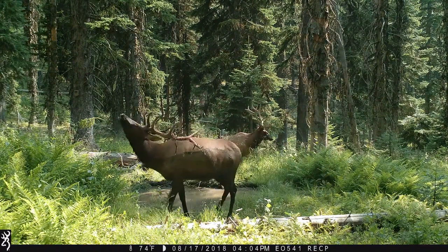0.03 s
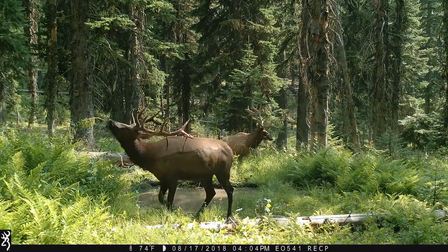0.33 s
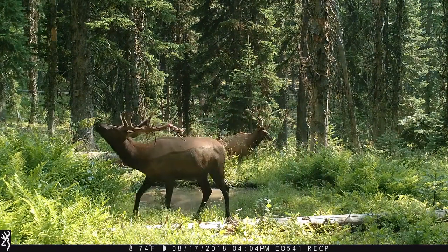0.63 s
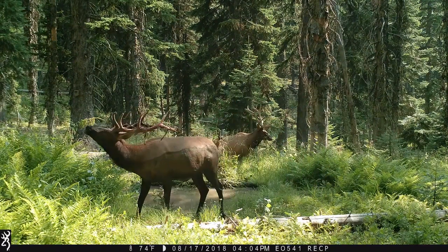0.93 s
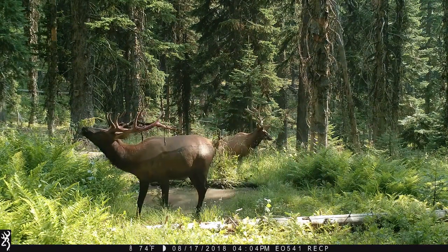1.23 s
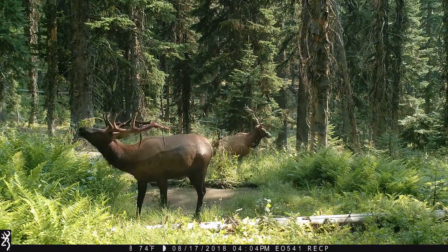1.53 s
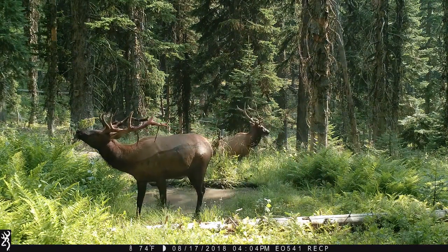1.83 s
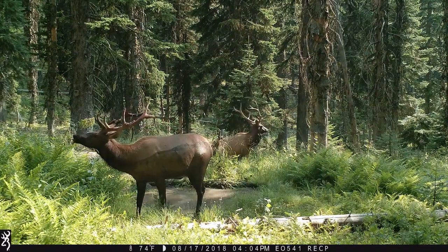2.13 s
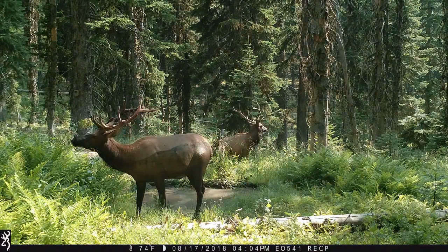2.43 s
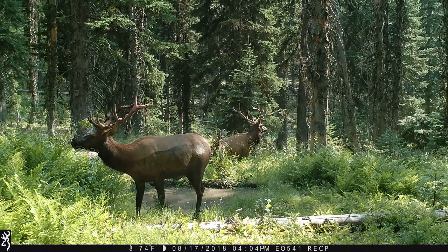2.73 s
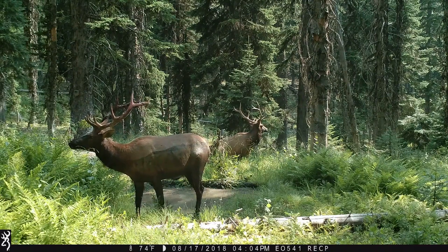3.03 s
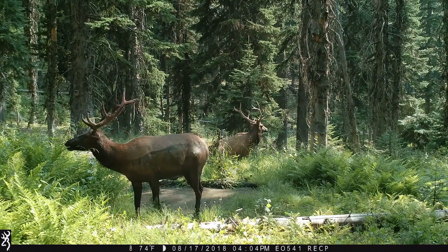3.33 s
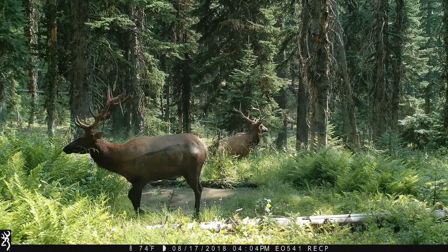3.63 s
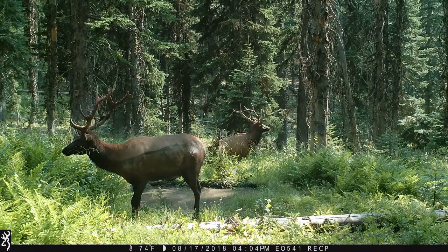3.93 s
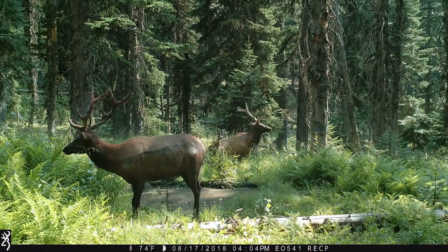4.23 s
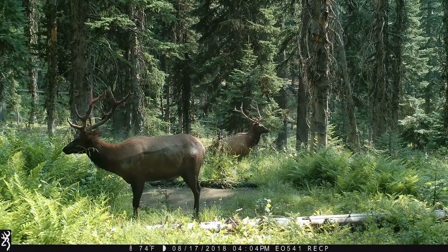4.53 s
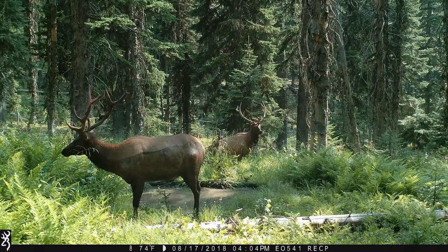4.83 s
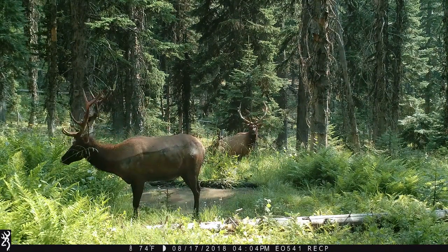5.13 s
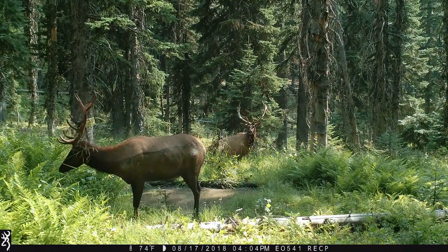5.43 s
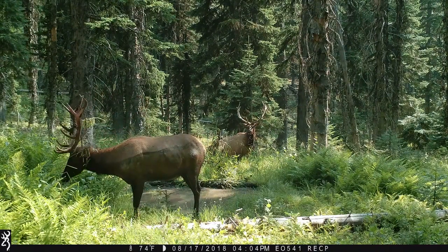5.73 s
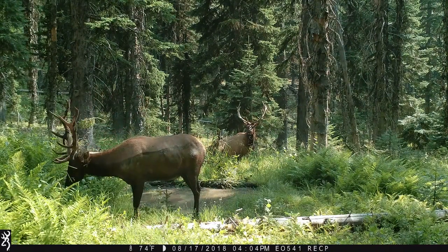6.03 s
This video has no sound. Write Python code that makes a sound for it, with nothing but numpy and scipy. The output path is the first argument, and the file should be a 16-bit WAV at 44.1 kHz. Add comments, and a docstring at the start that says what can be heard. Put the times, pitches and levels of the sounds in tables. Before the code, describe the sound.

From the start, an elk pushes out one long, high, fluttering hiss of air, strongest around 0.5 seconds and weakening near 2 seconds. At about 2.3 seconds it ends in a soft, lower, breathy huff. Ferns swish against the animal's legs during the hiss, and hooves thud softly on soil at about 0.4, 0.7 and 1.6 seconds. Twigs crackle in small clusters from 0.3 to 0.8 seconds, from 1.5 to 1.7, and from 2.3 to 2.5. At 3.5 seconds a dry stick gives one sharp, bright snap, by far the loudest sound. The breaking wood echoes faintly off the tree trunks. Lighter fern swishes come and go from about 3 seconds, growing fainter toward the end at 6 seconds. Underneath, a soft, even rush of forest air and a thin, high electronic whine stay constant. Everything is heard in mono.

```python
"""A bull elk hisses in the ferns

In a forest clearing the elk pushes air through its nearly closed mouth in one long hiss, then ends with
a soft, low huff. Ferns brush its legs, hooves thud, twigs crackle and one dry stick snaps loudly. The
breaking wood echoes off the trunks. A mono trail camera adds a thin electronic whine to the quiet air."""
import sys
import numpy as np
from scipy import signal
from scipy.fft import rfft, irfft, next_fast_len
from scipy.io import wavfile
from scipy.ndimage import map_coordinates

SR = 44100
rng = np.random.default_rng(int(sys.argv[2]) if len(sys.argv) > 2 else 0)


def wav_out(sig):
    """Save sig, one row per channel (or a flat mono array), as 16-bit PCM at SR to the path in sys.argv[1]."""
    wavfile.write(sys.argv[1], SR, np.round(np.clip(np.atleast_2d(sig).T, -1, 1) * 32767).astype(np.int16))


N = 272097


def hiss():
    """A fluttering jet of air rushes through the nearly closed mouth and makes it ring."""
    # How hard the elk blows. Each row: time in seconds, level in dB.
    effort = [(0, -34.5), (.24, -33.5), (.43, -31.5), (.66, -31.8), (.9, -35), (1.76, -35.7), (2.02, -41),
              (2.25, -41.5)]
    # The tone of the jet. Each row: frequency in Hz, relative level in dB.
    jet_spectrum = [(1000, -19), (2600, -19.5), (3650, -15.5), (4150, -5.5), (5400, -4.5), (5950, -0.4),
                    (6480, 0.5), (6950, -2), (7300, -2.5), (8300, -8.5), (9200, -9), (10800, -13.5),
                    (12500, -26), (15500, -29)]
    times, levels = np.transpose(effort)
    effort_db = np.interp(np.arange(N) / SR, times, levels)
    flutter = amp(0.61 * wobble(34.76) + 0.39 * wobble(260))
    jet = amp(effort_db) * coloured(rng.standard_normal(N), jet_spectrum)
    mouth = unit(filtered(rng.standard_normal(N), lambda f: resonance(f, hz=4010, width_hz=350) ** 2))
    mouth *= amp(-48.5 + 0.16 * (effort_db - levels.mean()))  # follows the effort only a little
    # When the jaw opens, the jet dies away and the ring of the mouth goes even faster.
    jaw_opens_s = 2.23
    jet *= gate(0, jaw_opens_s, rise_db_per_s=0, fall_db_per_s=54)
    mouth *= gate(0, jaw_opens_s, rise_db_per_s=0, fall_db_per_s=130)
    return flutter * (jet + mouth)


def huff():
    """The rest of the elk's air leaves through the open throat as a low huff."""
    # The tone of the open throat. Each row: frequency in Hz, relative level in dB.
    throat_spectrum = [(300, -10), (900, -5), (1500, -2), (1950, -1), (2500, -7), (3300, -5), (5000, -9),
                       (10000, -21)]
    start_s, hold_s = 2.316, 0.25
    flow = gate(start_s, start_s + hold_s, rise_db_per_s=160, fall_db_per_s=115)
    return amp(-45.5) * flow * coloured(rng.standard_normal(N), throat_spectrum)


def stick():
    """A dry stick snaps: its fibres break with bright pings, then the freed stick rings lower."""
    # The quick breaks that make up the snap. Each row: start in seconds, relative level in dB.
    fractures = [(3.4984, -6), (3.4989, -2.5), (3.4997, 1)]
    # The tones of a ping. Each row: pitch in Hz, relative level in dB, seconds to fade by 60 dB.
    ping_tones = [(2240, -28, 0.015), (3300, -23.5, 0.017), (4150, -39, .005), (5400, -12.5, 0.0047),
                  (5830, -12, 0.0061), (6400, -8.5, 0.0038), (6930, -8.5, 0.003), (8160, -12, 0.0042),
                  (8800, -26, 0.0054), (12500, -33, 0.0028)]
    # The ring of the stick as it bends: pitch in Hz, level in dB, seconds to fade by 60 dB.
    bend = (1340, -8.5, .014)
    out, t = np.zeros(N), np.arange(SR // 10) / SR
    opening_s = 0.00008
    opening = 1 - np.exp(-t / opening_s)  # a crack takes a moment to open, which softens it
    for start, db in fractures:
        ping = sum(amp(tone_db + rng.normal(0, 1) - 60 * t / fade_s) * np.sin(2 * np.pi * hz * t)
                   for hz, tone_db, fade_s in ping_tones)
        add(out, start, amp(db + 1.5) * ping * opening)
    # Splinters keep tearing just after the last break.
    tearing = np.zeros(N)
    add(tearing, fractures[-1][0], rng.standard_normal(len(t)) * amp(-17 - 60 * t / 0.03))
    out += filtered(tearing, lambda f: resonance(f, hz=6700, width_hz=7000) ** 2)
    bend_hz, bend_db, bend_fade_s = bend
    swell = 1 - np.exp(-t * bend_hz / 2)
    ring = np.sin(2 * np.pi * bend_hz * t) * amp(bend_db - 60 * t / bend_fade_s)
    add(out, fractures[0][0], ring * swell)
    # A thin stick gives off almost no bass.
    return signal.sosfilt(signal.butter(2, 1000, "highpass", fs=SR, output="sos"), out)


def ferns():
    """Fronds slide along the elk's legs and sides, each a soft swish full of tiny leaf ticks."""
    # One sweep of a frond. Each row: loudest moment in seconds, level in dB, length in seconds.
    sweeps = [(0.062, -39, 0.23), (0.414, -35.5, 0.2), (.6, -40.5, 0.29), (0.736, -39.5, .07),
              (1.06, -35, 0.13), (1.28, -44.5, .2), (1.636, -40.5, 0.49), (1.95, -43.5, 0.37),
              (2.224, -38.5, .16), (3.15, -49, 0.25), (3.328, -46, 0.15), (3.466, -44.5, 0.17),
              (3.59, -41.5, 0.26), (3.934, -46.5, 0.26), (4.047, -50.5, 0.13), (4.43, -45, .14),
              (4.52, -48.5, 0.46), (5.04, -51, 0.31), (5.284, -49, .2), (5.69, -53, .8)]
    # The tone of the swish. Each row: frequency in Hz, relative level in dB.
    swish_spectrum = [(500, -14.5), (2000, -9), (3300, -1.5), (4600, -2.5), (6300, 1), (8500, -0.5),
                      (10500, -6), (12500, -7), (15500, -16)]
    ticks_per_s, rise_db, fall_db = 900, 18.5, 10
    ticks = (rng.random(N) < ticks_per_s / SR) * rng.standard_normal(N)
    ticks *= amp(3.5 * np.minimum(rng.exponential(size=N), 4))  # a few stand out
    rub = rng.standard_normal(N) + amp(-6.5) * unit(ticks)
    power = sum((amp(db) * gate(peak_s, peak_s, rise_db / length, fall_db / length)) ** 2
                for peak_s, db, length in sweeps)
    power += amp(-59.5) ** 2  # the ferns never lie quite still
    return np.sqrt(power) * coloured(rub, swish_spectrum)


def twigs():
    """Each twig gives a short crack that rings briefly at its own pitch, then crumbles."""
    # Twigs breaking under the hooves. Each row: start in seconds, level in dB, pitch in Hz.
    cracks = [(.318, -25, 2900), (0.356, -22.5, 2200), (.368, -22, 2120), (.369, -23, 3550),
              (.409, -24.5, 2140), (.438, -26.5, 2060), (.616, -28, 2530), (0.7485, -22, 1600),
              (1.509, -29.5, 2920), (1.512, -30, 1600), (1.537, -31, 1800), (1.742, -27.5, 3380),
              (2.273, -26.5, 1800), (2.461, -28.5, 4500), (2.463, -25, 1810), (2.491, -26, 2120)]
    out, t = np.zeros(N), np.arange(SR // 16) / SR
    f = np.fft.rfftfreq(len(t), 1 / SR)
    snap = amp(-60 * t / 0.0059)
    crumble = amp(-9.5 - 60 * t / 0.055)
    for start, db, hz in cracks:
        burst = rng.standard_normal(len(t)) * (snap + crumble)
        crack = irfft(rfft(burst) * resonance(f, hz, width_hz=1160) ** 2, len(t))
        add(out, start, amp(db - 0.5) * crack / np.abs(crack).max())
    return out


def hooves():
    """A hoof pushes into soft soil and thuds: a few low vibrations that die quickly."""
    # The footfalls. Each row: start in seconds, level in dB, pitch in Hz.
    steps = [(0.358, -29, 570), (.731, -27, 200), (1.572, -33.5, 80)]
    out, t = np.zeros(N), np.arange(SR // 5) / SR
    for start, db, hz in steps:
        cycles = hz * t
        swell = 1 - np.exp(-cycles / 0.13)
        add(out, start, amp(db - 5 * cycles) * swell * np.sin(2 * np.pi * cycles))
    return out


def trunk_echo(sound):
    """Nearby ground and stems scatter a quick echo; far trunks send back a faint, long one."""
    # How long the far echo lasts. Each row: frequency in Hz, seconds to fade by 60 dB.
    fade_times = [(200, 0.31), (1500, 0.54), (4000, 1), (8000, 0.25), (14000, 0.42)]
    hz, t, bands = signal.stft(rng.standard_normal(SR), SR, nperseg=256)
    bands *= amp(-60 * t / along(fade_times, hz)[:, None])
    _, far = signal.istft(bands, SR, nperseg=256)
    t = np.arange(len(far)) / SR
    spikes = rng.standard_normal(len(t)) ** 3
    near = spikes * amp(-60 * t / 0.067) * (t > 0.002)
    echo = amp(-14.5) * far / np.linalg.norm(far) + amp(-13) * near / np.linalg.norm(near)
    return signal.fftconvolve(sound, echo)[:N]


def forest_air():
    """Still air among the trees makes a soft, even rush."""
    # The tone of the air. Each row: frequency in Hz, relative level in dB.
    air_spectrum = [(20, -1.5), (80, 0), (160, -2), (400, -4.5), (750, -8.5), (1050, -9.5), (1300, -7),
                    (1700, -8), (2050, -15), (3000, -19.5), (5000, -24), (9000, -29), (15500, -26)]
    return amp(-43 + 0.35 * wobble(2.28)) * coloured(rng.standard_normal(N), air_spectrum)


def camera_whine(hz=7867.2):
    """The camera's electronics sing on one steady high note."""
    return amp(-43) * unit(np.sin(2 * np.pi * hz * np.arange(N) / SR))


def amp(db):
    """Turn decibels into a number to multiply a sound by."""
    return 10 ** (np.asarray(db) / 20)


def unit(sound):
    """Scale a sound to an average power of 1."""
    return sound / np.sqrt(np.mean(sound ** 2) + 1e-20)


def along(points, hz):
    """Read between (frequency, value) points, giving each octave about equal room."""
    frequencies, values = np.transpose(points)
    return np.interp(np.log(hz + 1), np.log(frequencies + 1), values)


def wobble(rate):
    """A smooth curve through `rate` random values a second."""
    return map_coordinates(rng.standard_normal(int(N * rate / SR) + 4), [np.arange(N) * rate / SR])


def gate(start, end, rise_db_per_s, fall_db_per_s):
    """A volume curve that rises to 1, holds from start to end (in seconds), then falls."""
    t = np.arange(N) / SR
    return amp(-rise_db_per_s * np.maximum(start - t, 0) - fall_db_per_s * np.maximum(t - end, 0))


def filtered(sound, response):
    """Multiply each frequency in a sound by response(frequency)."""
    size = next_fast_len(N + SR // 2)
    return irfft(rfft(sound, size) * response(np.fft.rfftfreq(size, 1 / SR)), size)[:N]


def coloured(sound, spectrum):
    """Shape a sound's tone with (Hz, dB) points and set its average power to 1."""
    return unit(filtered(sound, lambda hz: amp(along(spectrum, hz))))


def resonance(f, hz, width_hz):
    """How something that rings at `hz` responds to each frequency in f."""
    return 1j * f * width_hz / (hz * hz - f * f + 1j * f * width_hz)


def add(track, start_s, sound):
    """Mix a short sound into a track."""
    part = track[max(round(start_s * SR), 0):][:len(sound)]
    part += sound[:len(part)]


def scene():
    """Everything reaches one microphone, so both channels are the same."""
    wood = twigs() + stick()
    mono = hiss() + huff() + ferns() + hooves() + wood + trunk_echo(wood) + forest_air() + camera_whine()
    return np.array([mono, mono])


def record(dry):
    """The camera cuts off the very highest treble."""
    top_hz = 15350
    return np.array([filtered(channel, lambda hz: hz < top_hz) for channel in dry])


dry = scene()
out = record(dry)
wav_out(out)
```